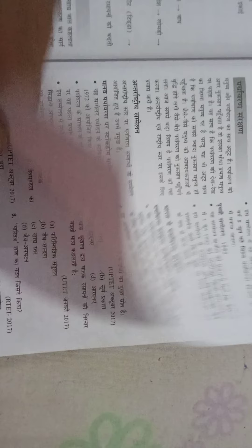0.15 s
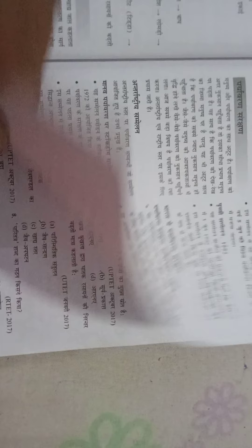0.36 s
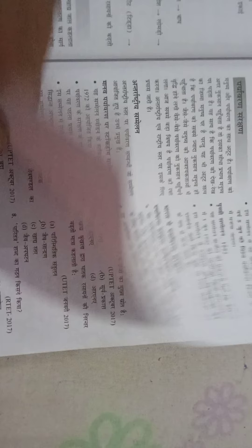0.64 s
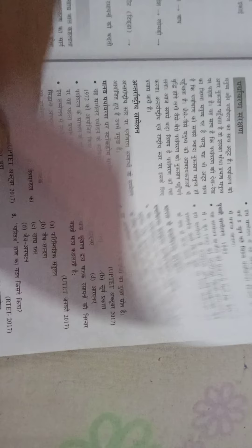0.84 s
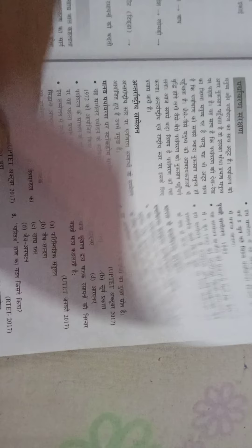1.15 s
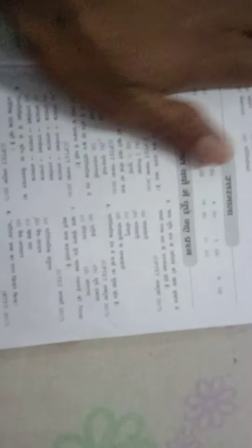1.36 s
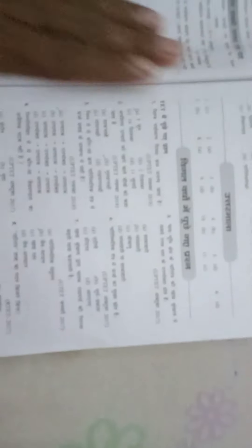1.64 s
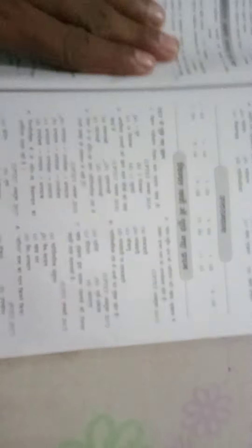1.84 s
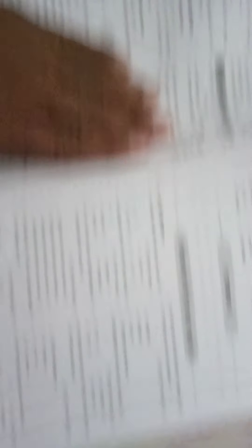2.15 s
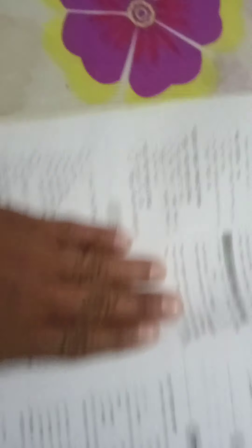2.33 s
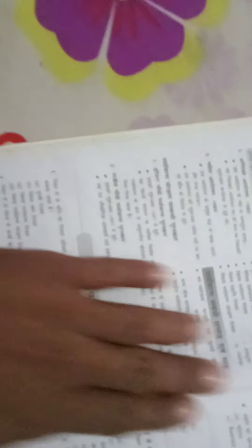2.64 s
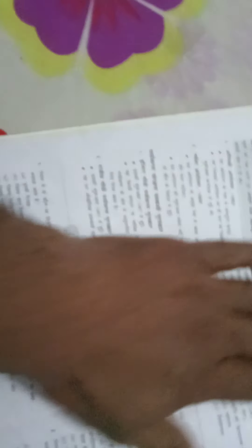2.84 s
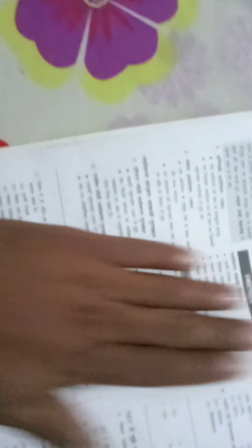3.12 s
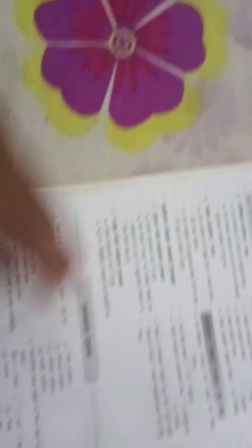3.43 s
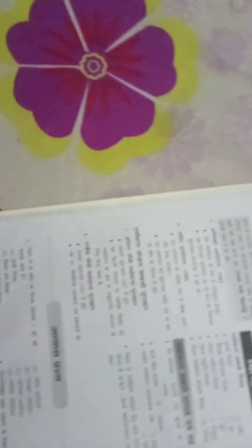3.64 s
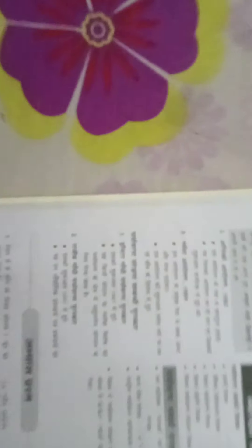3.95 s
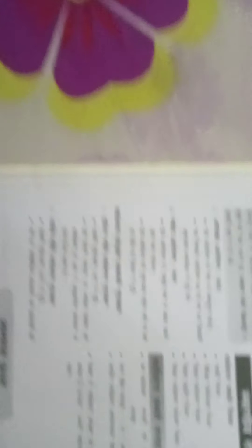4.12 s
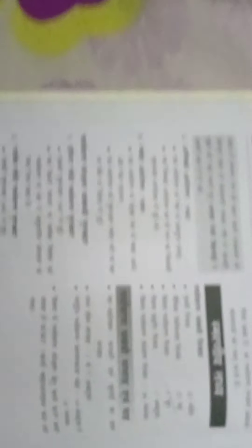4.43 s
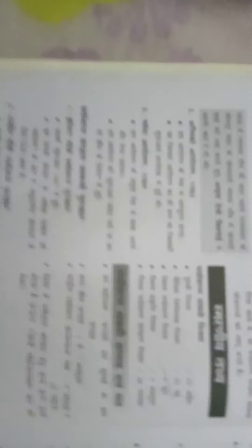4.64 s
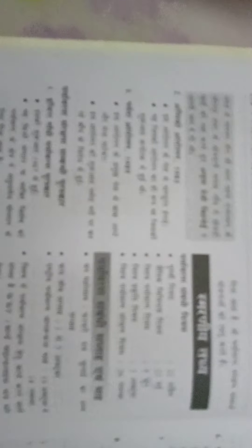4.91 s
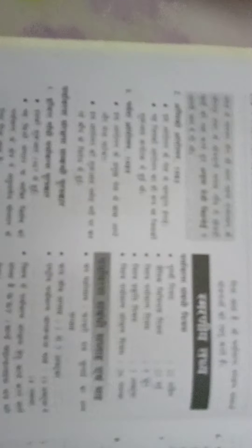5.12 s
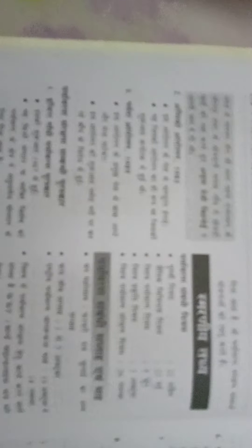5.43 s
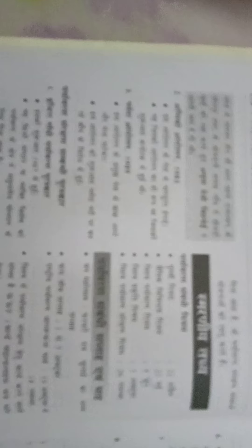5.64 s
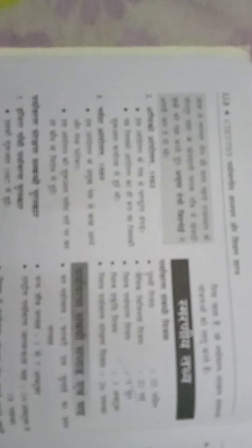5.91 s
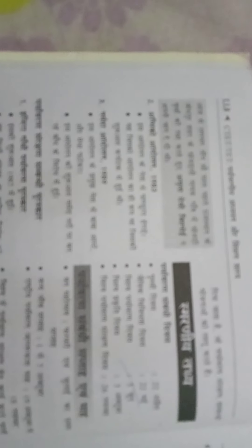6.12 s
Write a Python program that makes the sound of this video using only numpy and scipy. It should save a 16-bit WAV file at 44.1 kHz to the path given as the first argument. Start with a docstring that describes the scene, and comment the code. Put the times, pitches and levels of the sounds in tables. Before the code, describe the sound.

Close to a phone microphone in a quiet, dry room, a hand turns book pages. Loud crisp crackles and swishes come first, then softer rubbing with thumps, a brief rising and falling squeak as a page slides, strong smoothing strokes with snaps, a cluster of dull taps and edge ticks, and finally faint hiss.

```python
"""Skin and paper rub in swishes of fine grains as a hand turns and smooths book pages close to a phone: noise
and random impulses take the sheet's spectrum, and each hand stroke swells them in an arch. Creases snap as
resonant pulses and the sheet crumples in dying bursts; close knocks and handling contacts flash as bright
noise, pages and fingers thump on the book as damped sines, and one sliding page squeaks as a gliding tone.
Shaped noise makes a low rumble and a faint hiss underneath, and a quiet room answers the hits."""
import sys
import numpy as np
from scipy import signal
from scipy.fft import rfft, irfft, next_fast_len
from scipy.io import wavfile
from scipy.ndimage import uniform_filter1d, map_coordinates

SR = 44100
rng = np.random.default_rng(int(sys.argv[2]) if len(sys.argv) > 2 else 0)


def bounce(signal):
    """Save signal as a 16-bit WAV file at the path given by the first command-line argument."""
    frames = np.transpose(np.atleast_2d(signal))
    limited = np.clip(frames, -1, 1)
    pcm = np.round(limited * 32767).astype(np.int16)
    wavfile.write(sys.argv[1], SR, pcm)


N = 276507  # samples

# spectrum of fast slips and bright contact bursts close by: frequency_hz, density_db (per Hz)
NEAR_SLIP = [(3500, -2), (6500, -3), (7800, 3.5), (9500, -10.5), (11700, -18), (14500, -11)]
NEAR_FROM_S = 3.8  # from here on the contacts sound closer


def amp(db):
    """Level law: decibels to amplitude gain."""
    return 10 ** (np.asarray(db) / 20)


def unit(x):
    """Normalisation: scaled to rms 1."""
    return x / np.sqrt(np.mean(x ** 2) + 1e-20)


def curves(rows):
    """Linear interpolation: one value per sample for each column after the time."""
    s, *columns = np.transpose(rows)
    return [np.interp(np.arange(N) / SR, s, column) for column in columns]


def wobble(rate):
    """Slow random modulation: a smooth curve through random knots, rate knots a second."""
    knots = rng.standard_normal(int(N * rate / SR) + 4)
    return map_coordinates(knots, [np.arange(N) * rate / SR])


def coloured(x, points):
    """Linear filtering: x through a (Hz, dB) spectrum drawn over log frequency, rms 1."""
    m = next_fast_len(N + 8192)
    hz, db = np.transpose(points)
    gain = amp(np.interp(np.log(np.fft.rfftfreq(m, 1 / SR) + 1), np.log(hz + 1), db))
    return unit(irfft(rfft(x, m) * gain, m)[:N])


def patchy(x, depth_db):
    """Time-frequency modulation: x with random louder and softer patches."""
    z = signal.stft(x, nperseg=256)[2]
    over_frequency = uniform_filter1d(rng.standard_normal(z.shape), 4, 0)
    field = uniform_filter1d(over_frequency, 8, 1)
    return signal.istft(z * amp(depth_db * unit(field)), nperseg=256)[1][:N]


def dying(at, db, t60):
    """Exponential decay: a gain that jumps up at a moment and falls 60 dB in t60 seconds."""
    t = np.arange(N) / SR - at
    return (t >= 0) * amp(db - 60 * np.abs(t) / t60)


def background():
    """Broadband noise: a lumpy low rumble and a steady faint hiss."""
    # level of the low rumble: time_s, level_db
    rumble_level = [(0, -54), (.4, -58), (1.06, -49), (1.5, -52), (3.3, -57), (4.1, -57), (4.4, -47.5),
                    (4.7, -58), (5.2, -53), (5.6, -61.5), (6.27, -63.5)]
    # spectrum of the rumble: frequency_hz, density_db (per Hz)
    rumble_tone = [(40, -25.5), (60, 0.5), (130, 4), (210, 2), (280, -6.5), (500, -55)]
    # spectrum of room and preamp hiss: frequency_hz, density_db (per Hz)
    hiss_tone = [(250, -2.5), (400, 5), (1300, -1.5), (2800, -1), (6400, -22.5), (8000, -19), (9700, -36),
                 (15800, -33)]
    hiss_db = -68.5
    lumps = amp(5.2 * wobble(15) + 2.0 * wobble(35))
    lumpy = unit(lumps * coloured(rng.standard_normal(N), rumble_tone))
    rumble = amp(curves(rumble_level)[0]) * lumpy
    hiss = coloured(patchy(rng.standard_normal(N), depth_db=2.0), hiss_tone)
    return rumble + amp(hiss_db) * hiss


def room(x):
    """Reverberation: convolution with a short, dull, decaying noise tail."""
    t = np.arange(SR // 5) / SR
    dull_noise = signal.lfilter([1], [1, -.6], rng.standard_normal(len(t)))
    tail = dull_noise * amp(-60 * t / 0.14)  # t60 0.14 s
    delayed = np.pad(x, (150, 0))  # samples
    return signal.fftconvolve(delayed, tail / np.linalg.norm(tail))[:N]


def squeak():
    """Stick-slip oscillation at a sliding page edge: a gliding tone that flickers."""
    # course of the squeak before its flicker: time_s, pitch_hz, level_db
    glide = [(2.21, 498, -44.5), (2.255, 697, -54), (2.32, 1023, -50), (2.35, 1157, -47), (2.37, 1150, -41),
             (2.403, 900, -37.5), (2.445, 514, -35), (2.478, 525, -38), (2.49, 517, -62)]
    hz, db = curves(glide)
    phase = 2 * np.pi * np.cumsum(hz * (1 + 0.023 * wobble(90))) / SR
    s = np.arange(N) / SR
    sliding = (s > glide[0][0]) & (s < glide[-1][0])
    return sliding * amp(db + 3.0 * wobble(70)) * np.sin(phase)


def ticks():
    """Impulsive contact: close knocks and handling contacts carry tiny bursts of bright noise."""
    # bright edges of close knocks and contacts: start_s, level_db
    contacts = [(3.8727, -43.5), (3.881, -48.5), (3.886, -50), (3.899, -48), (3.9844, -54), (4.001, -43.5),
                (4.2984, -30), (4.3135, -46), (4.326, -43), (4.4068, -47.5), (4.43, -34), (4.4418, -33),
                (4.448, -39.5), (4.54, -35.5), (4.5475, -36), (4.9843, -39.5), (5.1005, -54)]
    t60_s = 0.0062
    envelope = sum(dying(s, db, t60_s) for s, db in contacts)
    return envelope * coloured(rng.standard_normal(N), NEAR_SLIP)


def thumps():
    """Damped modes: a soft contact pushes the page block, a low mode and a quicker upper one."""
    # soft blows on the book: start_s, peak_db, pitch_hz
    blows = [(0.8972, -27, 332), (1.0169, -27.5, 131), (1.0541, -31, 513), (1.0893, -25, 352),
             (1.291, -28, 330), (1.637, -27.5, 438), (2.499, -28.5, 374), (2.7616, -28, 635),
             (2.782, -23, 327), (2.8813, -34.5, 684), (3.2889, -23, 580), (3.5648, -22.5, 620),
             (3.8728, -22.5, 184), (3.884, -19.5, 350), (3.9872, -26.5, 193), (4.0005, -20, 187),
             (4.2285, -37, 172), (4.298, -18.5, 213), (4.3135, -25, 156), (4.3269, -28, 171),
             (4.3723, -19.5, 190), (4.439, -19, 243), (4.5494, -23.5, 274), (4.983, -27, 362),
             (5.0998, -27.5, 352), (5.1652, -31.5, 185)]
    body_hz, body_db = 560, -5  # close by, the upper mode is this one of the page block
    rings_from_s = 4.9  # the last blows let the book ring on
    ring_hz, ring_db, ring_t60_s = 372, -16, .11  # level against the low mode
    out, t = np.zeros(N + SR), np.arange(SR // 8) / SR
    for s, db, hz in blows:
        t60 = 0.0069 + 4.24 / hz
        low = np.sin(2 * np.pi * hz * t) * amp(-60 * t / t60)
        upper_hz, upper_db = (body_hz, body_db) if s > NEAR_FROM_S else (1.64 * hz, 0)
        upper = np.sin(2 * np.pi * upper_hz * t) * amp(upper_db - 110 * t / t60)
        ring = np.sin(2 * np.pi * ring_hz * t) * amp(ring_db - 60 * t / ring_t60_s)
        soft_onset = 1 - np.exp(-t / 0.0012)
        blow = (low + upper + (s > rings_from_s) * ring) * soft_onset
        out[round(s * SR):][:len(t)] -= amp(db) * blow / np.abs(blow).max()
    return out[:N]


def snaps():
    """Impulse excitation: a crease releases a sharp pulse and short burst into a broad resonance."""
    # creases snapping: start_s, peak_db, centre_hz
    creases = [(0.0155, -11, 2160), (0.1064, -21, 1500), (0.1323, -18, 1120), (0.232, -7.5, 2400),
               (.281, -32, 1240), (.404, -26, 1600), (0.5863, -13, 3460), (0.6105, -11.5, 3050),
               (0.723, -15.5, 2440), (1.023, -21, 2290), (1.09, -17.5, 2150), (1.3888, -14.5, 1320),
               (1.6361, -22.5, 1060), (1.851, -19.5, 830), (3.154, -19.5, 890), (3.2888, -11, 1260),
               (3.328, -19, 895), (3.3748, -11, 1370), (3.3831, -10, 1050), (3.394, -19, 985),
               (3.5644, -18, 1190), (3.882, -15, 1410), (3.9528, -28, 1080), (3.9843, -19, 1340),
               (4.0105, -28.5, 880), (4.299, -23.5, 960), (4.4328, -16.5, 980), (4.44, -17.5, 1410),
               (4.5044, -36.5, 2300), (4.54, -23.5, 1390), (4.547, -21.5, 990), (4.696, -31.5, 2270),
               (4.9853, -31, 1020), (5.167, -30, 890)]
    slack_hz = 3400  # close by, the slack sheet dulls its creases above this
    out, t = np.zeros(N + SR), np.arange(1024) / SR
    hz = np.fft.rfftfreq(4096, 1 / SR)
    # paper radiates little above a few kHz
    dull = (1 / (1 - (hz / 4300) ** 2 + 1j * hz / 4300)) ** 2
    for s, db, centre in creases:
        burst = 0.17 * rng.standard_normal(len(t)) * amp(-60 * t / 0.018)
        burst[0] = 3.06  # the sharp pulse
        ring = 1j * hz * centre / (centre ** 2 - hz ** 2 + 1j * hz * centre)
        slack = 1 / (1 + (s > NEAR_FROM_S) * 1j * hz / slack_hz) ** 2
        click = irfft(rfft(burst, 4096) * ring * dull * slack)[:len(t)]
        out[round(s * SR):][:len(t)] -= amp(db) * click / np.abs(click).max()
    return out[:N]


def strokes():
    """Power addition: arched strokes and dying crumples give gains of rubbing, fast slips, flutter."""
    # hand strokes over the paper, slip and flutter relative to level:
    # fastest_s, speeding_up_s, slowing_down_s, level_db, slip_db, flutter_db
    hand_strokes = [(.06, 0.2, 0.17, -35.5, -23, -11), (.2, 0.066, 0.13, -37.5, -15, -21),
                    (.44, 0.21, 0.1, -35, -15.5, -24), (0.584, 0.072, 0.23, -38, -22.5, -19.5),
                    (0.718, 0.075, 0.02, -35, -10, -19), (1.02, 0.0095, 0.36, -40.5, -20, -10),
                    (1.278, 0.29, 0.18, -39, -19.5, -19.5), (1.55, 0.14, 0.21, -35.5, -24, -20),
                    (1.701, 0.29, 0.17, -38, -14.5, -19), (1.898, 0.24, 0.16, -48.5, -21, -7),
                    (2.351, 0.36, 0.31, -41, -19, -10), (2.548, 0.49, 0.12, -42, -10.5, -5.5),
                    (2.79, 0.19, 0.25, -38.5, -10.5, -11.5), (2.918, 0.14, 0.15, -33, -15.5, -14.5),
                    (3.162, 0.1, 0.16, -35, -14.5, -13), (3.31, 0.27, 0.17, -31.5, -10.5, -14),
                    (3.52, 0.67, 0.046, -48.5, -4.5, -3.5), (3.93, .007, 0.074, -57, -4.5, 9.5),
                    (4.04, 0.21, 0.21, -62.5, -6, 4), (4.228, 0.041, 0.014, -59, -13.5, 0.5),
                    (4.345, 0.028, 0.075, -54.5, -4.5, 7.5), (4.429, 0.068, 0.04, -58.5, -5, 15),
                    (4.66, 0.19, 0.095, -64, 1, 1), (4.77, 0.078, 0.061, -69.5, 8, 1),
                    (5.185, 0.037, 0.054, -64, -4, 1)]
    # the sheet gives way in a ragged burst: start_s, level_db, t60_s
    crumples = [(0.0132, -24.5, 0.063), (.716, -31, 0.031), (1.0225, -28.5, 0.079), (4.429, -43, .04),
                (4.805, -46, 0.024)]
    crumple_slip_db, crumple_flutter_db = -28, -5  # relative to level
    # fingers lying on the page between strokes: level_db, slip_db, flutter_db
    resting = (-66, -18.5, 0)
    still_s, settle_s = 5.95, 0.87  # the resting fingers fade out by still_s
    roundness = 1.97  # how pointed the arch of a stroke is
    s = np.arange(N) / SR
    db, slip_db, flutter_db = resting
    settling = np.clip((still_s - s) / settle_s, 0, 1)
    power = amp([[db], [db + slip_db], [db + flutter_db]]) ** 2 * settling ** 2
    for at, rise, fall, db, slip_db, flutter_db in hand_strokes:
        u = np.clip((s - at) / np.where(s < at, rise, fall), -1, 1)
        arch = amp(db) * (1 - u ** 2) ** roundness
        power += (arch * amp([[0], [slip_db], [flutter_db]])) ** 2
    for burst in crumples:
        power += (dying(*burst) * amp([[0], [crumple_slip_db], [crumple_flutter_db]])) ** 2
    return np.sqrt(power)


def rubbing():
    """Friction noise: fibres catch and let go in clumps, and the sheet colours the grains."""
    # spectra of the radiating sheet, each: frequency_hz, density_db (per Hz)
    sheet_tone = [(700, -34.5), (1500, -10), (2200, -1.5), (3100, 0), (4100, -4), (6000, -22.5),
                  (8000, -41)]  # the rubbing
    slip_tone = [(4500, -33.5), (6200, -6), (7500, 5), (9700, -14.5), (11500, -20.5), (14000, -12.5),
                 (15800, -5)]  # fast slips
    palm_air = [(11000, -21), (13000, -7.5), (15800, -2)]  # top of the flat palm's slips
    flutter_tone = [(200, -7), (400, 1), (700, 0.5), (1400, -4), (2100, -12.5), (3000, -58.5)]  # low flutter
    scrape_tone = [(620, -3), (1050, -31), (1600, -3), (2200, 6), (2700, -4), (3500, -60)]  # a curled page edge dragged flat
    taut_until_s, taut_pitch = .9, 1.106  # the first page is held taut and sounds higher
    near_pitch = 0.86  # close by, the slack sheet sounds lower
    palm_from_s, palm_to_s = 2.63, 3.46  # the flat palm smooths the page and hisses higher
    scrape_from_s, scrape_to_s, scrape_db = 4.555, 4.82, -54
    rub, slip, flutter = strokes()
    s = np.arange(N) / SR

    clumps = amp(0.97 * wobble(24.9))
    strengths = amp(1.0 * np.minimum(rng.exponential(size=N), 2))
    catches = strengths * (rng.random(N) < .012) * rng.standard_normal(N)
    rough = clumps * (rng.standard_normal(N) + 0.25 * unit(catches))
    grains = patchy(rough, depth_db=2.0)

    taut, flat, slack = [coloured(grains, [(k * hz, db) for hz, db in sheet_tone])
                         for k in (taut_pitch, 1, near_pitch)]
    sheet = np.select([s < taut_until_s, s < NEAR_FROM_S], [taut, flat], slack)

    # small sudden bends crackle low
    bends = amp(3.4 * rng.exponential(size=N))
    buckles = bends * (rng.random(N) < .003) * rng.standard_normal(N)
    low = amp(3.4 * wobble(30.01)) * coloured(unit(grains) + 0.61 * unit(buckles), flutter_tone)

    near = coloured(grains, NEAR_SLIP)
    airy = coloured(grains, slip_tone[:4] + palm_air)
    under_palm = (s > palm_from_s) & (s < palm_to_s)
    slips = np.select([s > NEAR_FROM_S, under_palm], [near, airy], coloured(grains, slip_tone))

    dragging = (s > scrape_from_s) * (s < scrape_to_s)
    scrape = dragging * amp(scrape_db) * coloured(grains, scrape_tone)
    return rub * sheet + slip * slips + flutter * low + scrape


def scene():
    """Superposition: all sources add at one microphone, which feeds both channels."""
    hits = snaps() + thumps() + ticks()
    mono = hits + amp(-24) * room(hits) + rubbing() + squeak() + background()
    return np.array([mono, mono])


def record(dry):
    """Band limiting: the phone cuts the deep bass and keeps nothing above its top frequency."""
    top_hz, bass_hz = 15800, 60
    m = next_fast_len(N + 8192)
    hz = np.fft.rfftfreq(m, 1 / SR)
    low_cut = (1j * hz / (bass_hz + 1j * hz)) ** 2
    return irfft(rfft(dry, m) * low_cut * (hz < top_hz), m)[:, :N]


dry = scene()
out = record(dry)
bounce(out)
```